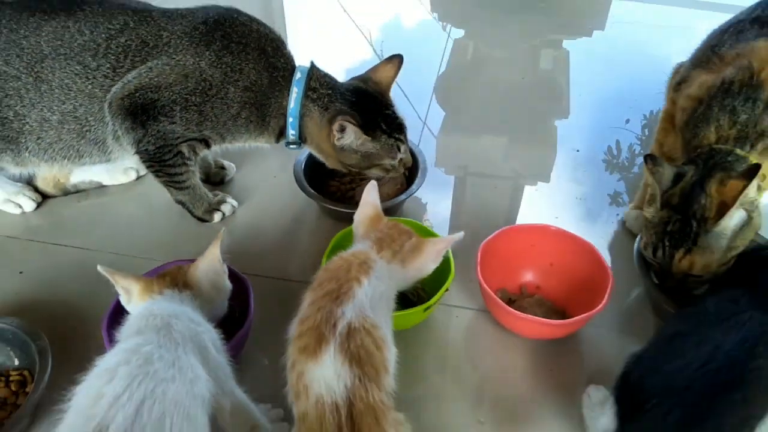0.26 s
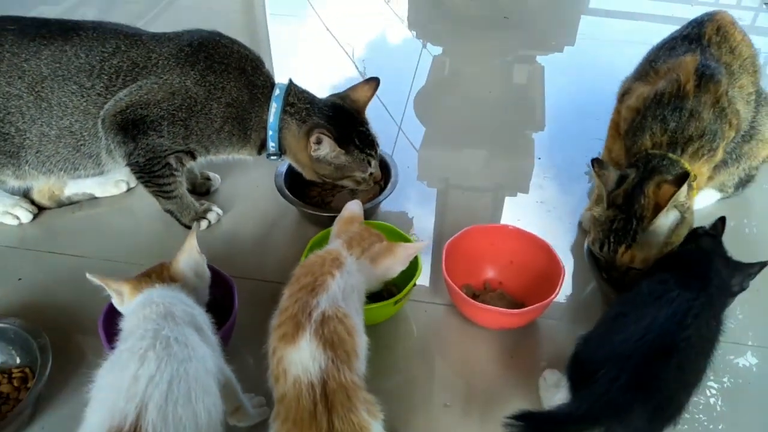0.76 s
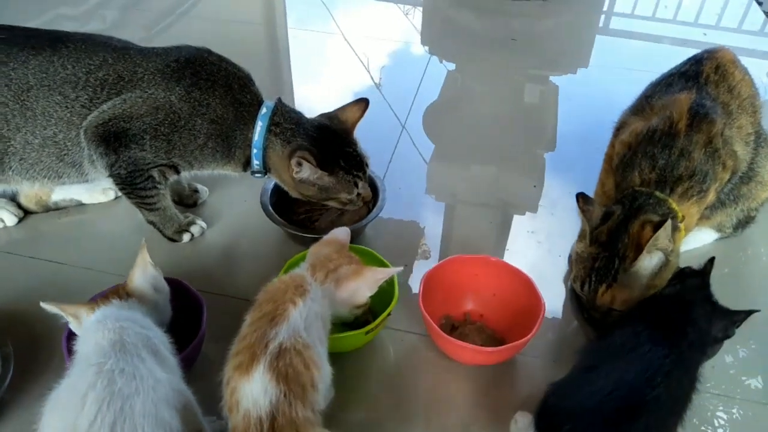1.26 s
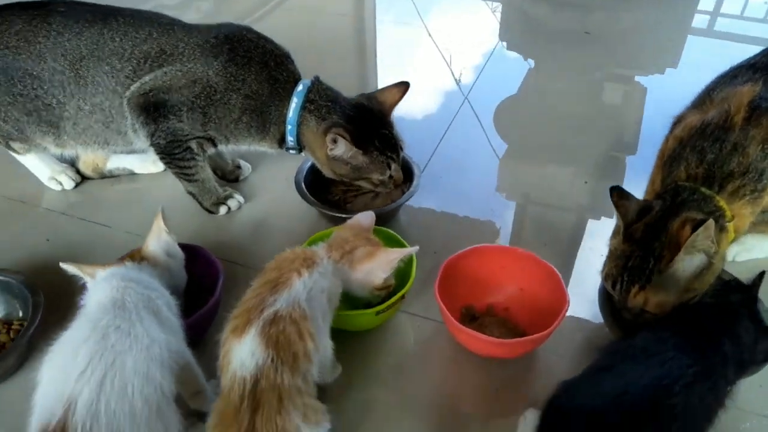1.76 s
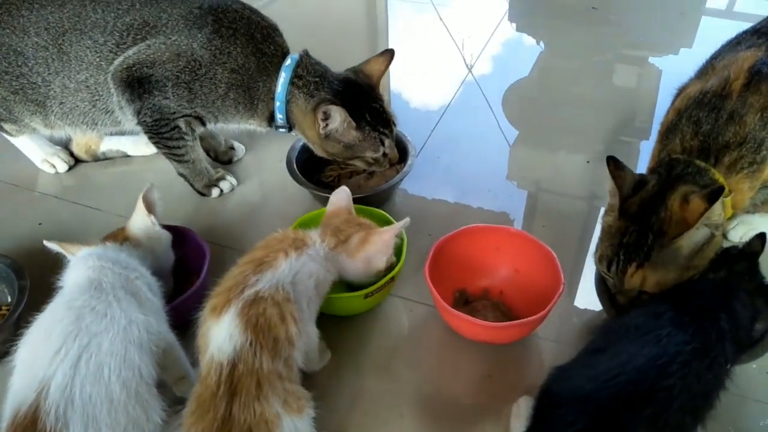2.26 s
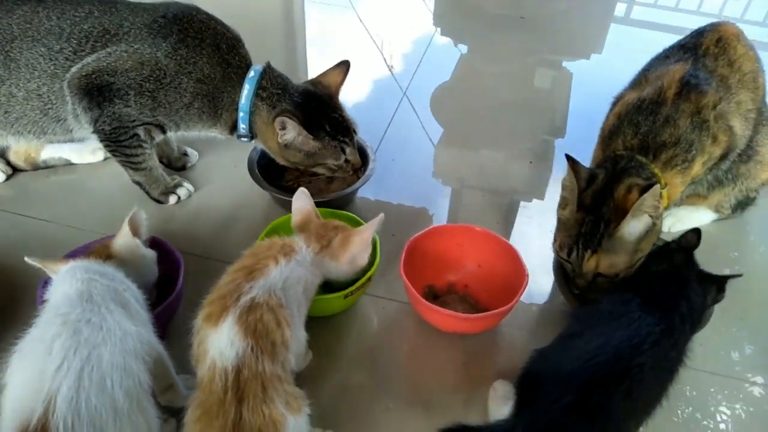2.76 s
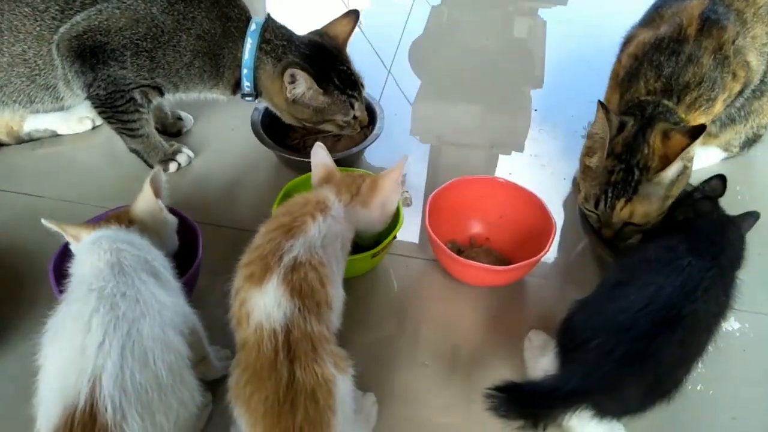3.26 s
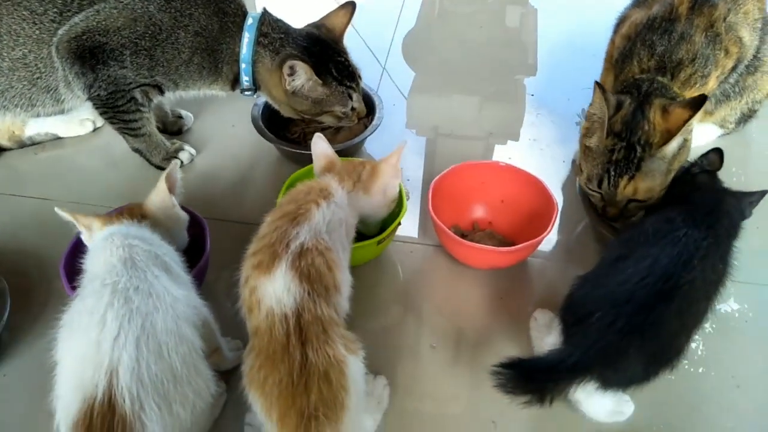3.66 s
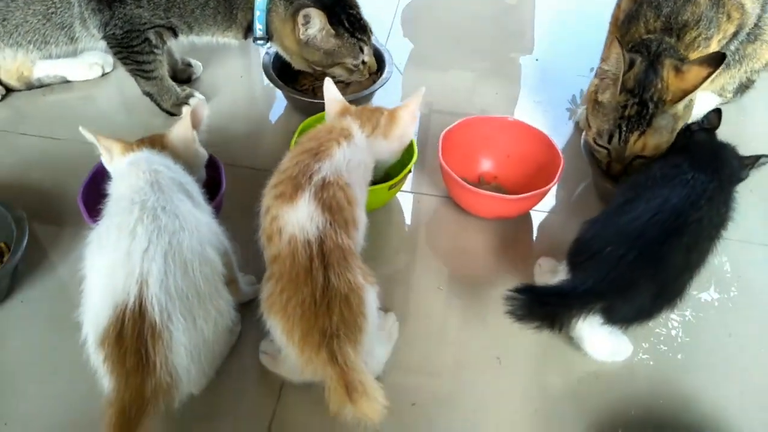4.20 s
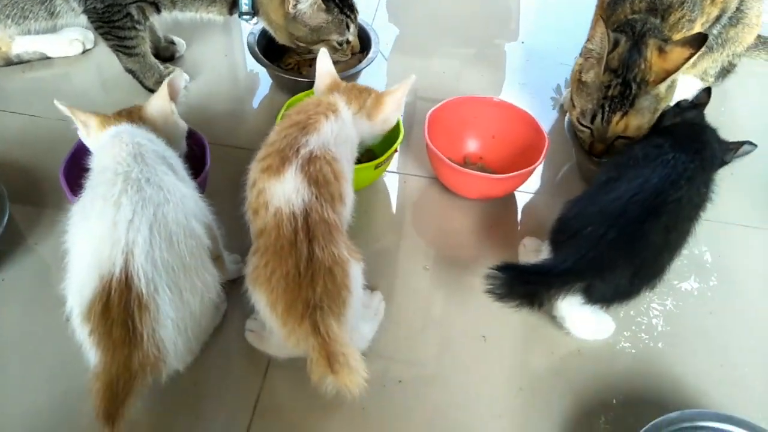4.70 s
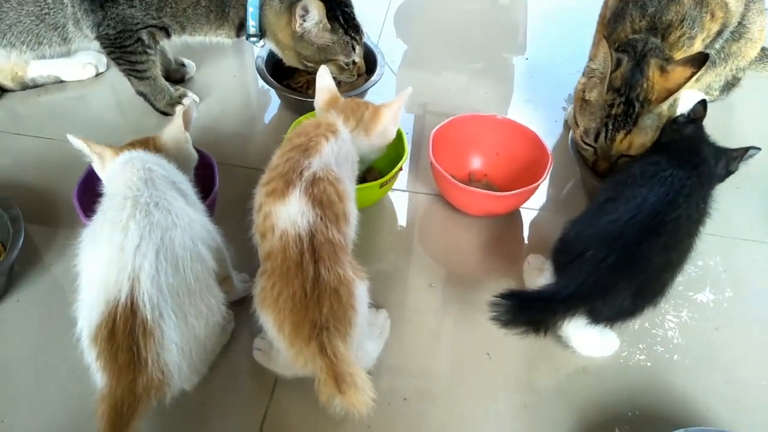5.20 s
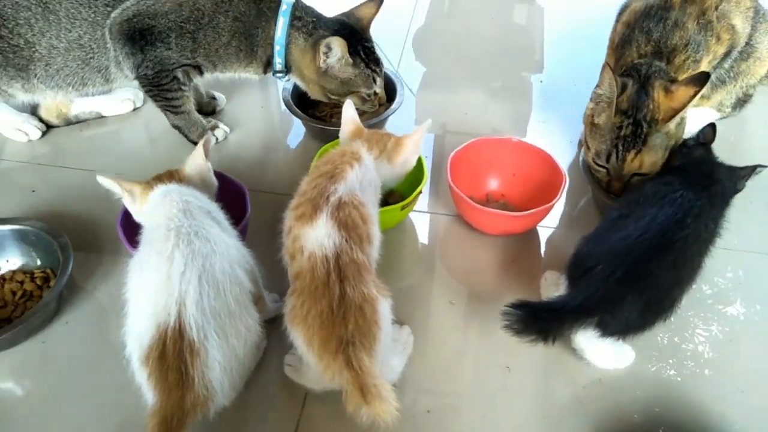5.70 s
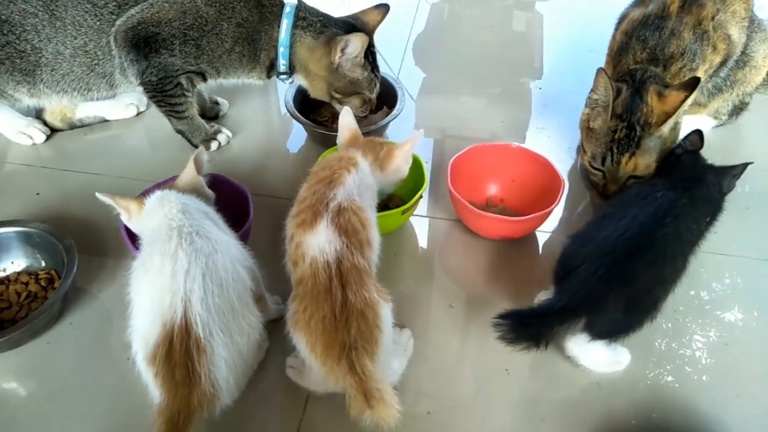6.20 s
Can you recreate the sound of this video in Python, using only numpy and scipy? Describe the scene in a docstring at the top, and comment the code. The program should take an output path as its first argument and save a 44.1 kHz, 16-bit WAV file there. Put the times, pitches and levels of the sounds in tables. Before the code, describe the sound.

On a tiled porch, cats faintly crunch dry food while birds chirp nearby. Low handling rumble and soft bumps come from the hand-held microphone. A steel bowl drags with gritty scrapes and bright clinks, then another lands with a loud, quickly rocking clatter. Later come a very hard knock, a faint singing rim, and two more knocks near the end. The bowls are close and fairly dry, with a short echo.

```python
"""Birds chirp under the roof nearby and cats crunch dry food, heard on a tiled porch.
Close to the microphone a steel bowl is dragged over the tiles and clinks, another is set down with
a clatter, and hard knocks fall among them. The hand-held microphone rumbles as it is moved.
Chirps are gliding sines, crunches are bursts of tiny fractures, bowls are decaying modes and gritty
scrapes, and rumble is filtered noise. Source levels are relative: the mix in scene() sets the balance."""
import sys
import numpy as np
from scipy import signal
from scipy.fft import rfft, irfft
from scipy.io import wavfile
from scipy.ndimage import uniform_filter1d

SR = 44100
rng = np.random.default_rng(int(sys.argv[2]) if len(sys.argv) > 2 else 0)


def master(y):
    """Save y as 16-bit WAV."""
    cut = np.clip(np.atleast_2d(y).T, -1, 1)
    pcm = np.round(cut * 32767)  # scale
    wavfile.write(sys.argv[1], SR, pcm.astype(np.int16))


N = 284445
TIME = np.arange(N) / SR  # s

# Hand on the microphone, strength of the rumble: [t/s, level/dB]
GRIP_LEVELS = [(0.0, -43.5), (0.21, -51), (0.25, -41.5), (0.75, -50.5), (0.81, -36.5), (1.17, -54),
               (1.29, -35), (1.81, -53), (1.89, -37.5), (2.24, -47), (3.75, -55), (3.83, -35),
               (4.02, -50.5), (4.13, -31.5), (4.18, -39), (4.4, -32.5), (4.51, -47.5), (4.58, -37),
               (4.67, -49.5), (4.97, -40.5), (5.03, -48), (6.45, -65)]
# Spectra of the deep and upper rumble: [f/Hz, level/dB]
DEEP_RUMBLE = [(15, -8), (35, -1.5), (60, -1.5), (85, 6), (110, -20.5), (200, -27)]
UPPER_RUMBLE = [(55, -39.5), (90, 0.5), (130, 3), (170, -6), (230, -15.5), (330, -42), (600, -41)]
# Fingers bump the case: [t/s, peak level/dB, f/Hz]
CASE_BUMPS = [(.425, -26.5, 79), (.507, -24, 77), (.81, -23.5, 62.5), (1.299, -16.5, 127), (1.346, -24, 71),
              (1.518, -24.5, 91), (4.12, -21.5, 92), (4.269, -17, 86), (4.384, -20, 68), (4.935, -24.5, 89)]
BUMP_T60_S = 0.073

# A low hum, fading early on: [t/s, level/dB]
HUM_LEVELS = [(0, -42.5), (.3, -46.5), (.7, -48.5), (1.1, -51.5)]
# A thin tone, fading sooner: [t/s, level/dB]
THIN_TONE_LEVELS = [(0, -64.5), (.24, -64), (.4, -86)]
HUM_HZ, THIN_TONE_HZ = 133, 1800
# Spectrum of the quiet air: [f/Hz, level/dB]
AIR_SPECTRUM = [(200, -2.5), (350, -3), (700, 0), (1500, -2.5), (2500, -2.5), (4000, -11), (6500, -14.5),
                (10000, -16), (14000, -10), (16000, -15)]
AIR_DB = -65.5

# Nearest bird: [t/s, length/s, start f/Hz, level/dB]
NEAR_CHIRPS = [(.056, .12, 4430, -49.5), (.29, 0.058, 2380, -56), (.35, 0.044, 2883, -45),
               (.546, .04, 4100, -59), (.635, .09, 4380, -55), (.67, 0.047, 2574, -49),
               (.723, 0.051, 1800, -59.5), (.745, 0.095, 5590, -64.5), (.993, 0.068, 2510, -55.5),
               (1.037, 0.055, 3120, -54), (1.13, 0.037, 2126, -51), (1.19, 0.054, 2343, -52),
               (1.427, 0.036, 2418, -53), (1.44, .08, 1974, -55), (1.554, 0.055, 2680, -61),
               (1.857, .04, 2680, -48), (2.588, 0.068, 2363, -46), (3.896, 0.06, 2052, -60.5),
               (4.363, 0.049, 1567, -51.5), (4.762, 0.029, 2074, -57.5), (5.18, 0.065, 1870, -58.5),
               (5.214, .04, 2400, -58), (5.377, .03, 1960, -54), (5.676, .08, 2580, -54),
               (5.816, 0.042, 2078, -58), (6.036, 0.026, 2706, -53), (6.094, 0.048, 2560, -49),
               (6.316, 0.059, 2070, -53.5), (6.387, 0.056, 2620, -50.5)]
CHIRP_ATTACK_S, CHIRP_RELEASE_S = .007, .025
CHIRP_FALL_OCTAVES_PER_S, CHIRP_RASP = 1.05, 0.22  # fall is shared by all notes; rasp 0-1
# Harsh calls: [t/s, length/s, start f/Hz, level/dB, rasp/0-1]
HARSH_CALLS = [(0.223, 0.14, 4010, -50.5, 0.54), (4.048, 0.064, 2437, -50.5, 0.51),
               (5.398, .09, 5000, -65, 0.88), (5.401, .13, 3430, -56, .9)]
# Birds farther off, at random
FAR_CHIRPS_PER_S, FAR_CHIRP_DB, FAR_CHIRP_HZ, FAR_CHIRP_S = 1.8, -68, 2430, .05

# Loudest cracks of kibble: [t/s, level/dB, centre f/Hz, decay/s]
LOUD_CRUNCHES = [(.365, -40.5, 3120, .016), (0.382, -45.5, 3530, .02), (0.452, -48.5, 2970, 0.019),
                 (1.039, -54, 3900, 0.017), (1.558, -46.5, 3370, 0.0041), (1.655, -50.5, 3870, 0.0056),
                 (1.745, -53, 4350, 0.009), (2.943, -41, 4050, 0.0061), (2.974, -53.5, 2100, 0.014),
                 (3.221, -48, 3000, 0.021), (3.7395, -27.5, 3300, 0.0033), (4.876, -33.5, 3200, .006)]
# Spectrum of the cracks: [f/Hz, level/dB]
CRUNCH_SPECTRUM = [(400, -22), (1200, -2), (2200, 1), (5500, 7), (8000, -4), (13000, 1.5), (16000, -0.5)]
NIBBLES_PER_S, NIBBLE_DB, NIBBLE_HZ, NIBBLE_S = 1.1, -59.5, 3800, 0.012  # fainter cracks at random

# A muzzle nudges a bowl: [t/s, strength/dB]
MUZZLE_NUDGES = [(.459, -34), (3.390, -41.5)]
# Soft ring of the nudged bowl: [f/Hz, level/dB, t60/s]
NUDGED_MODES = [(995, -6, .09), (2130, -12, .1), (2626, 2.5, .11)]
NUDGE_CONTACT_S = .012
# A rubbed rim sings briefly: [f/Hz, level/dB]
RUBBED_RIM_TONES = [(1766, -74.5), (1933, -65), (3354, -56), (5066, -61), (7020, -76)]
RIM_S, RIM_SWELL_S, RIM_T60_S, RIM_DB, RIM_WAVER_DB = 4.925, .065, .35, 8.5, 4.5

# Pushes that drag the bowl over the tiles: [t/s, swell/s, length/s, level/dB]
DRAG_PUSHES = [(1.865, 0.057, .09, -33), (1.958, 0.0075, .13, -30), (2.08, .05, .07, -42.5),
               (2.14, 0.029, .09, -32.5), (2.298, .008, .06, -40.5), (2.355, .028, .09, -34.5)]
SLIDE_SAG_DB_PER_S, SLIDE_STOP_S = 127.5, .014  # a slide loses speed, then stops
# The dragged rim catches on the tiles: [t/s, strength/dB, free ringing/dB]
RIM_CATCHES = [(1.920, -15.5, -2.5), (1.9645, -16, -8), (2.015, -36, -12), (2.057, -13, -30),
               (2.168, -28, -5), (2.220, -29, -19), (2.304, -24.5, -3), (2.358, -26.5, 7), (2.456, -9.5, 0)]
# Ringing modes of the dragged bowl: [f/Hz, level/dB, t60/s]
DRAGGED_BOWL_MODES = [(808, -37, 0.19), (1060, -20, 0.042), (1584, -43, 1), (1750, -27.5, 0.18),
                      (1927, -20, 0.19), (2370, -37.5, 0.63), (3200, -23.5, 0.36), (3390, -17.5, 0.082),
                      (4340, -35.5, 0.37), (5600, -36, 0.42), (5570, -22, 0.13), (7030, -36, 0.2),
                      (7180, -36, 0.34), (8640, -32.5, 0.16), (10040, -27.5, 0.061), (12100, -26, 0.065),
                      (13140, -41, 0.19), (13850, -28, 0.081), (15000, -36, 0.082)]
# Spectrum of its gritty contact with the floor: [f/Hz, level/dB]
GRIT_SPECTRUM = [(200, -31), (550, -21), (750, -5), (1060, 5), (1420, 4.5), (1680, -0.5), (2200, 9.5),
                 (2900, 4.5), (4600, 1.5), (6000, -7), (8000, -20.5), (11000, -20), (13500, -10.5),
                 (16000, -20)]

# Hard knocks on bowls and tiles:
# [t/s, strength/dB, brightness/dB per octave, rebound gap/s, ring f/Hz, ring level/dB, ring t60/s]
HARD_KNOCKS = [(1.9641, -21, 3, .003, 1134, -5.5, 0.11), (4.8188, -1, 0, .007, 1750, -4.5, 0.026),
               (6.122, -19, -8, .004, 840, -24, .02), (6.1748, -3.5, 1.5, .0016, 3480, -13, 0.015)]
# Spectrum of the knocks: [f/Hz, level/dB]
KNOCK_SPECTRUM = [(80, -20), (220, -16.5), (420, -2.5), (900, 7), (1400, -3), (1900, 0), (2700, 2),
                  (3500, 0.5), (4800, -10.5), (5700, -7.5), (7000, -28), (10000, -22.5), (13500, -22),
                  (16000, -57)]
OVERTONE_RATIO, OVERTONE_DB = 1.65, -5  # second mode of each ring
REBOUND_LOSS_DB, REBOUND_TILT_DB = 7.5, .3  # per rebound: weaker, and brighter by dB per octave

# The other bowl lands and rocks on its base, each contact weaker and ringing more freely
LANDING_S, LANDING_DB, LANDING_FREE_DB = 3.4475, 6, 1
ROCK_PERIOD_S, ROCK_DB, ROCK_LOSS_DB = .0068, 3.5, 1.1  # mean gap; first contact; loss per contact
ROCK_FREE_DB, ROCK_FREEING_DB = -2.5, 1.0  # free ringing at the first contact; gain per contact
# Its last taps: [t/s, strength/dB, free ringing/dB]
LAST_TAPS = [(3.605, -20, -4), (3.647, -24, -23), (3.663, -19.5, 1.5)]
# It skids to rest: [t/s, swell/s, length/s, level/dB]
REST_SKIDS = [(3.505, 0.028, 0.043, -30.5), (3.598, .03, .05, -32), (3.66, 0.0029, 0.0061, -25.5)]
# Ringing modes of the bowl set down: [f/Hz, level/dB, t60/s]
SET_DOWN_MODES = [(409.5, -41, 0.12), (554, -39.5, 0.19), (724, -37.5, 0.19), (733, -38, 0.13),
                  (885, -37, 0.21), (1103, -37.5, .18), (1212, -39, 0.098), (1350, -25.5, .14),
                  (1375, -29, .17), (1652, -26.5, .18), (1826, -30, .46), (2190, -37, 0.17),
                  (2400, -40.5, .21), (3223, -33.5, 0.21), (3330, -43, 0.27), (4280, -44.5, 0.2),
                  (4500, -49.5, 0.21), (5430, -53, 0.47), (5550, -49.5, 0.42), (6910, -62.5, 0.37),
                  (8400, -52, 0.13), (10200, -54, 0.15), (12300, -56, 0.32), (14575, -55, .46)]
# Spectrum of the clank of each contact: [f/Hz, level/dB]
CLANK_SPECTRUM = [(90, -26), (160, -11.5), (270, -13), (480, -7.5), (750, -2.5), (1150, 3.5), (1750, -8.5),
                  (2600, -15), (3250, -14.5), (3800, -30), (4500, -13.5), (6500, -37.5), (9500, -45.5),
                  (12500, -32), (16000, -26)]
# Spectrum of the skids: [f/Hz, level/dB]
SKID_SPECTRUM = [(300, 9.5), (900, -19), (1900, 10.5), (2800, 1.5), (4500, 4), (5600, 4), (7000, -21.5),
                 (10000, -14.5), (12500, -2), (13600, 8), (14600, -2), (16000, -17)]

# Echo time of the porch: [f/Hz, t60/s]
PORCH_DECAY = [(150, .45), (700, 0.26), (2500, 0.31), (6000, 0.25), (15000, 0.24)]
CUTOFF_HZ = 15850


def from_db(db):
    """Decibels to gain."""
    return 10 ** (np.asarray(db) / 20)


def rms_one(x):
    """Scale to an rms of 1."""
    return x / np.sqrt(np.mean(x ** 2) + 1e-20)


def level(rows, column=1):
    """Gain over time from a column of dB; silent outside the rows."""
    rows = np.array(rows)
    return from_db(np.interp(TIME, rows[:, 0], rows[:, column], left=-200, right=-200))


def at_hz(points, hz):
    """Read a table on a log-frequency axis."""
    points = np.array(points)
    return np.interp(np.log(hz + 1), np.log(points[:, 0]), points[:, 1])


def add(track, s, sound):
    """Mix a sound into a track at a time in seconds."""
    start = max(round(s * SR), 0)
    track[start:start + len(sound)] += sound[:N - start]


def colour(x, spectrum, tilt_db=0, size=8192):
    """Causal (minimum-phase) filter of unit energy with the given spectrum, tilted per octave."""
    hz = np.arange(size // 2 + 1) * SR / size
    tilt = tilt_db * np.log2(np.maximum(hz, spectrum[1][0]))
    cepstrum = irfft(np.log(from_db(at_hz(spectrum, hz) + tilt)))
    # Folding the cepstrum forward in time makes the response minimum-phase
    cepstrum[1:size // 2] *= 2
    cepstrum[size // 2 + 1:] = 0
    response = irfft(np.exp(rfft(cepstrum)))
    return signal.fftconvolve(x, response / np.linalg.norm(response))[:len(x)]


def wander(count, rate_hz):
    """Smooth chance: straight lines between random knots with a spread of 1."""
    knots = rng.standard_normal(2000)
    return np.interp(np.arange(count) / SR * rate_hz, np.arange(len(knots)), knots)


def ring(clicks, hz, t60):
    """A two-pole resonator: a unit click starts a decaying sine of initial height 1."""
    r = from_db(-60 / (t60 * SR))
    w = 2 * np.pi * hz / SR
    return signal.lfilter([0, np.sin(w)], [1, -2 * r * np.cos(w), r * r], clicks + 1e-18)


def grains(count, per_s, spread_db):
    """Random tiny slips or fractures of uneven size; rms 1."""
    sizes = from_db(spread_db * np.minimum(rng.exponential(1, count), 4))
    signed = sizes * rng.choice([-1, 1], count)
    return rms_one(signed * (rng.random(count) < per_s / SR))


def scattered(per_s, level_db, hz, octaves, count=40):
    """Faint events at random moments, around one level and pitch: (t/s, level/dB, f/Hz)."""
    gap, strength, pitch = rng.random((count, 3)).T
    times = np.cumsum(2 * gap / per_s)
    levels = level_db + 3 * (2 * strength - 1)
    pitches = hz * 2 ** (octaves * (2 * pitch - 1))
    return [row for row in zip(times, levels, pitches) if row[0] < TIME[-1]]


def rumble(spectrum, even_s):
    """Coloured noise, divided by its own running level to keep it steady."""
    noise = colour(rng.standard_normal(N), spectrum)
    return noise / np.sqrt(uniform_filter1d(noise ** 2, int(even_s * SR)) + 1e-9)


def handling():
    """The shifting grip rumbles through the case, with soft bumps over a steady low drone."""
    grip = level(GRIP_LEVELS)
    upper = np.hypot(from_db(-3.5) * grip, from_db(-54.5))  # the drone is the floor under the grip
    out = grip * from_db(0.1) * rumble(DEEP_RUMBLE, even_s=0.18)
    out += upper * rumble(UPPER_RUMBLE, even_s=0.044)
    for s, peak_db, hz in CASE_BUMPS:
        add(out, s, from_db(peak_db) * ring(signal.unit_impulse(SR // 4), hz, BUMP_T60_S))
    return signal.sosfilt(signal.butter(4, 380, fs=SR, output="sos"), out)


def wavering_tone(hz, waver_hz, rate_hz):
    """A sine of rms 1 whose pitch wanders."""
    pitch = hz + waver_hz * wander(N, rate_hz)
    return np.sqrt(2) * np.sin(2 * np.pi * np.cumsum(pitch) / SR)


def background():
    """Still air as coloured noise, with a wavering low hum and a thin tone that fade early on."""
    hum = level(HUM_LEVELS) * wavering_tone(HUM_HZ, waver_hz=2.04, rate_hz=12.0)
    thin = level(THIN_TONE_LEVELS) * wavering_tone(THIN_TONE_HZ, waver_hz=35, rate_hz=250)
    air = from_db(AIR_DB) * colour(rng.standard_normal(N), AIR_SPECTRUM)
    return hum + thin + air


def birds():
    """Short falling whistles; a fast random wobble of pitch and strength makes them raspy."""
    out = np.zeros(N)
    far_rows = scattered(FAR_CHIRPS_PER_S, FAR_CHIRP_DB, FAR_CHIRP_HZ, octaves=0.41)
    far = [(s, FAR_CHIRP_S, hz, level_db) for s, level_db, hz in far_rows]
    chirps = [(*note, CHIRP_RASP) for note in NEAR_CHIRPS + far]
    for s, length, start_hz, level_db, rasp in HARSH_CALLS + chirps:
        count = int(length * SR)
        t = TIME[:count]
        glide = start_hz * 2 ** (-CHIRP_FALL_OCTAVES_PER_S * t)
        pitch = glide + rasp ** 1.4 * 520 * wander(count, rate_hz=900)
        gate = np.minimum(np.minimum(t / CHIRP_ATTACK_S, (length - t) / CHIRP_RELEASE_S), 1)
        swell = gate * from_db(rasp * 4 * wander(count, rate_hz=250))
        whistle = swell * np.sin(2 * np.pi * np.cumsum(pitch) / SR)
        add(out, s, from_db(level_db) * rms_one(whistle))
    return out


def peak_filter(x, hz, q):
    """One resonance."""
    return signal.lfilter(*signal.iirpeak(hz, q, fs=SR), x)


def kibble(size=8192):
    """Swells of fractures ring pitches around one centre; faint chewing ticks run throughout."""
    out = np.zeros(N)
    t = np.arange(size) / SR
    swell = 1 - np.exp(-(t / .002) ** 2)
    nibble_rows = scattered(NIBBLES_PER_S, NIBBLE_DB, NIBBLE_HZ, octaves=.3)
    nibbles = [(*row, NIBBLE_S) for row in nibble_rows]
    for s, level_db, hz, decay_s in LOUD_CRUNCHES + nibbles:
        cracks = colour(grains(size, per_s=9100, spread_db=5.5), CRUNCH_SPECTRUM)
        pitches = hz * np.exp(np.linspace(-.3, .3, 4) + .04 * rng.standard_normal(4))
        hollow = sum((-1) ** k * peak_filter(cracks, pitch, 12) for k, pitch in enumerate(pitches))
        crunch = rms_one(hollow + .13 * cracks) * swell * np.exp(-t / decay_s)
        add(out, s, from_db(level_db + 3.5) * crunch)
    chewing = peak_filter(grains(N, per_s=60, spread_db=2.0), 3600, 3)
    return out + from_db(-78.5) * rms_one(chewing)


def swelling_tone(t, hz, swell_s, t60):
    """A mode that builds up while it is rubbed, then dies away."""
    swell = np.minimum(t / swell_s, 1) ** 2
    decay = np.exp(-np.log(1000) * np.maximum(t - swell_s, 0) / t60)
    return swell * decay * np.sin(2 * np.pi * hz * t)


def touched_bowls():
    """Soft nudges ring a few modes; a rubbed rim swells into wavering tones and rings out."""
    out = np.zeros(N)
    for s, strength_db in MUZZLE_NUDGES:
        t = np.maximum(TIME - s, 0)
        for hz, mode_db, t60 in NUDGED_MODES:
            out += from_db(strength_db + mode_db) * swelling_tone(t, hz, NUDGE_CONTACT_S, t60)
    t = np.maximum(TIME - RIM_S, 0)
    for hz, tone_db in RUBBED_RIM_TONES:
        gain = from_db(RIM_DB + tone_db + RIM_WAVER_DB * wander(N, rate_hz=65))
        out += gain * swelling_tone(t, hz, RIM_SWELL_S, RIM_T60_S)
    return out


def slide_force(slides):
    """Each slide swells, sags as the bowl slows and stops."""
    force = np.zeros(N)
    for s, swell_s, length, level_db in slides:
        t = np.maximum(TIME - s, 0)
        swell = np.minimum(t / swell_s, 1)
        sag = from_db(level_db - SLIDE_SAG_DB_PER_S * np.maximum(t - swell_s, 0))
        stop = np.exp(-np.maximum(t - length, 0) / SLIDE_STOP_S)
        force = np.maximum(force, swell * sag * stop)
    return force


def scrape(force, spectrum, shift_db, clump_db, count=50):
    """Clumped slips feed damped resonances whose strengths shift as the contact point travels."""
    active = np.flatnonzero(force > 1e-6)
    size = len(active)
    clumps = from_db(clump_db * wander(size, rate_hz=240))
    slips = grains(size, per_s=1500, spread_db=3.5) * clumps
    pitches = np.geomspace(380, 15000, count) * np.exp(.015 * rng.standard_normal(count))
    body = np.zeros(size)
    for k, hz in enumerate(pitches):
        width_hz = 12 + .012 * hz
        shift = from_db(shift_db * wander(size, rate_hz=22))
        body += (-1) ** k * shift * peak_filter(slips, hz, hz / width_hz)
    sound = colour(rms_one(body) + .25 * rms_one(slips), spectrum)
    # Even out the loudness so that the force alone sets it
    steady = sound / np.sqrt(uniform_filter1d(sound ** 2, size=1200) + 1e-12)
    out = np.zeros(N)
    out[active] = force[active] * steady
    return out


def contact(buzz, buzz_s, size=8192):
    """One sharp click and the brief buzz of the surfaces settling."""
    tail = rng.standard_normal(size) * np.exp(-np.arange(size) / SR / buzz_s)
    return signal.unit_impulse(size) + buzz * tail / np.linalg.norm(tail)


def steel_bowl(hits, modes, contact_spectrum, clank_db, crowd_db, crowd_hz, buzz_s,
               count=4, size=40000):
    """Blows feed energy to main modes, ring weaker, shorter neighbours, and clank on the floor."""
    s, strength_db, free_db = np.transpose(hits)
    first = s.min()
    out, blows, crowd = np.zeros(N), np.zeros(N), np.zeros(size)
    t = np.arange(2 * size) / SR
    click = signal.unit_impulse(size)
    fed = np.zeros(len(t))
    fed[np.round((s - first) * SR).astype(int)] = from_db(strength_db + free_db) ** 2
    for hz, mode_db, t60 in modes:
        energy = signal.lfilter([1], [1, -from_db(-120 / (t60 * SR))], fed)
        tone = np.sqrt(energy) * np.sin(2 * np.pi * hz * t) * rng.choice([-1, 1])
        add(out, first, from_db(mode_db) * tone)
        neighbours = hz + crowd_hz * np.sqrt(hz / 3000) * rng.uniform(-1, 1, count)
        for near_hz in neighbours:
            sign = rng.choice([-1, 1])
            crowd += from_db(mode_db + crowd_db) * sign * ring(click, near_hz, .5 * t60)
    for when, gain, free in zip(s, from_db(strength_db), from_db(free_db)):
        add(blows, when, gain * contact(buzz=1.5, buzz_s=buzz_s))
        add(out, when, gain * free * crowd)
    return out + from_db(clank_db) * colour(blows, contact_spectrum)


def dragged_bowl():
    """The base sticks and slips over grit; the rim catches now and then, hardest at the end."""
    sliding = scrape(slide_force(DRAG_PUSHES), GRIT_SPECTRUM, shift_db=5.5, clump_db=5.0)
    clinks = steel_bowl(RIM_CATCHES, DRAGGED_BOWL_MODES, GRIT_SPECTRUM,
                        clank_db=-6.0, crowd_db=-10.0, crowd_hz=170, buzz_s=.003)
    return sliding + clinks


def knocks(count=3):
    """A dry crack with a short, damped ring of two modes and two quick rebounds."""
    out = np.zeros(N)
    click = signal.unit_impulse(SR // 4)
    for s, strength_db, tilt_db, gap_s, hz, ring_db, t60 in HARD_KNOCKS:
        overtone = from_db(OVERTONE_DB) * ring(click, hz * OVERTONE_RATIO, t60)
        body = ring(click, hz, t60) + overtone
        add(out, s, from_db(strength_db + ring_db) * body)
        for k in range(count):
            tilt = tilt_db + k * REBOUND_TILT_DB
            crack = colour(contact(buzz=1.0, buzz_s=0.0075), KNOCK_SPECTRUM, tilt)
            add(out, s + k * gap_s, from_db(strength_db - k * REBOUND_LOSS_DB) * crack)
    return out


def rocking(count=8):
    """The landing and the quick, uneven contacts after it: (t/s, strength/dB, free ringing/dB)."""
    k = np.arange(count)
    s = LANDING_S + ROCK_PERIOD_S * (k + 1 + .12 * rng.uniform(-1, 1, count))
    contacts = zip(s, ROCK_DB - ROCK_LOSS_DB * k, ROCK_FREE_DB + ROCK_FREEING_DB * k)
    return [(LANDING_S, LANDING_DB, LANDING_FREE_DB), *contacts]


def set_down_bowl():
    """The bowl lands, rocks quickly on its base and skids a little."""
    sliding = scrape(slide_force(REST_SKIDS), SKID_SPECTRUM, shift_db=5.0, clump_db=5.5)
    clatter = steel_bowl(rocking() + LAST_TAPS, SET_DOWN_MODES, CLANK_SPECTRUM,
                         clank_db=-1.5, crowd_db=-3.0, crowd_hz=225, buzz_s=0.0057)
    return from_db(-3.5) * sliding + clatter


def porch(x, build_s, size=32768):
    """Diffuse echo of unit energy from tiles and walls; each octave dies at its own rate."""
    t = np.arange(size) / SR
    response = np.zeros(size)
    edges = np.geomspace(70, 18000, 9)
    for low, high in zip(edges, edges[1:]):
        octave = signal.butter(2, [low, high], "band", fs=SR, output="sos")
        band = signal.sosfilt(octave, rng.standard_normal(size))
        t60 = at_hz(PORCH_DECAY, np.sqrt(low * high))
        response += band * np.exp(-np.log(1000) * t / t60)
    response *= 1 - np.exp(-t / build_s)
    return signal.fftconvolve(x, response / np.linalg.norm(response))[:N]


def scene():
    """Near things are drier than the birds; only the top of the echo and hiss is spread wide."""
    bowls = dragged_bowl() + set_down_bowl() + touched_bowls()
    knocking, eating, song = knocks(), kibble(), birds()
    near = from_db(-10.5) * bowls + from_db(-11.0) * knocking + from_db(-9) * eating  # echo send
    echo = porch(near + from_db(-3.0) * song, build_s=.004)
    direct = bowls + knocking + eating + from_db(-4) * song
    mid = direct + echo + handling() + background()
    hiss = from_db(-79) * rng.standard_normal(N)
    spread = from_db(-4.5) * porch(near, build_s=0.00218) + hiss
    side = signal.sosfilt(signal.butter(8, 5600, "high", fs=SR, output="sos"), spread)
    return np.array([mid + side, mid - side])


def record(dry):
    """Peaks are rounded and the top is cut."""
    low_pass = signal.ellip(10, .05, 60, CUTOFF_HZ, fs=SR, output="sos")
    return signal.sosfiltfilt(low_pass, np.tanh(dry))


dry = scene()
out = record(dry)
master(out)
```